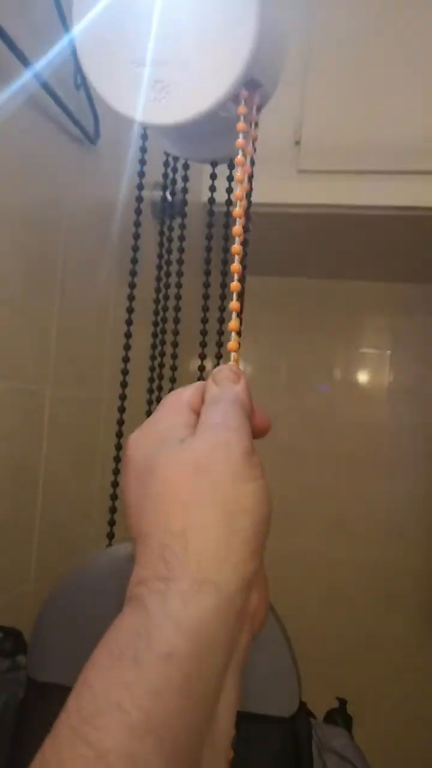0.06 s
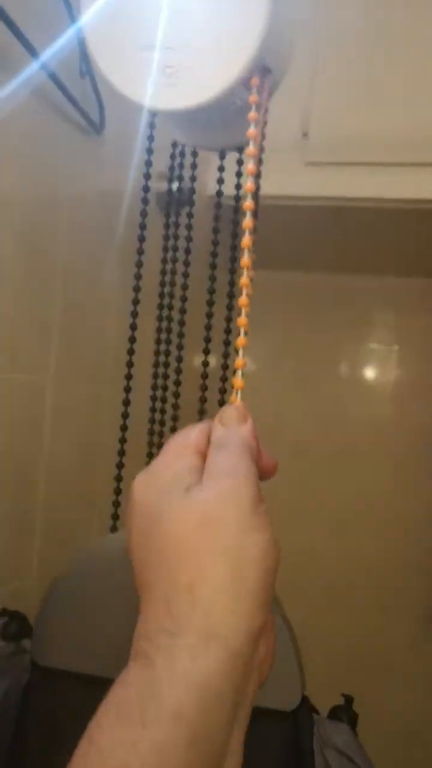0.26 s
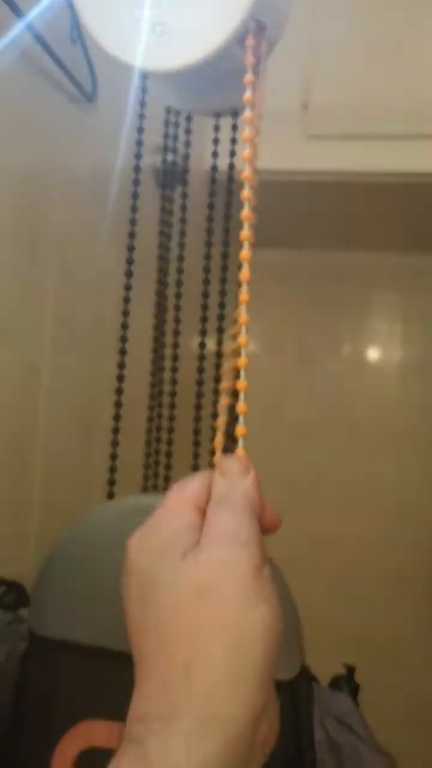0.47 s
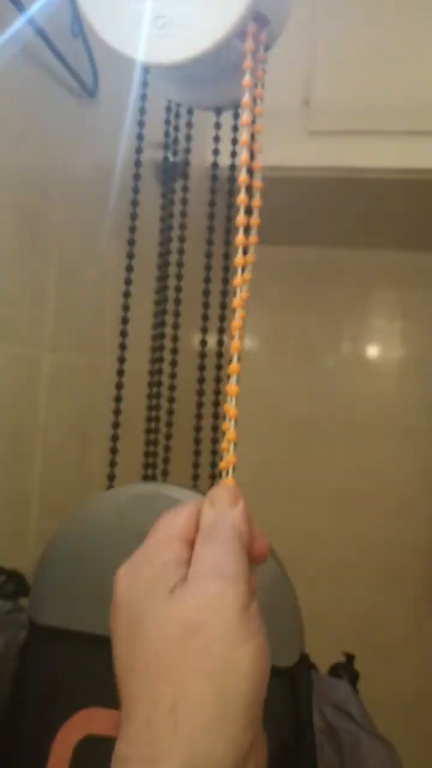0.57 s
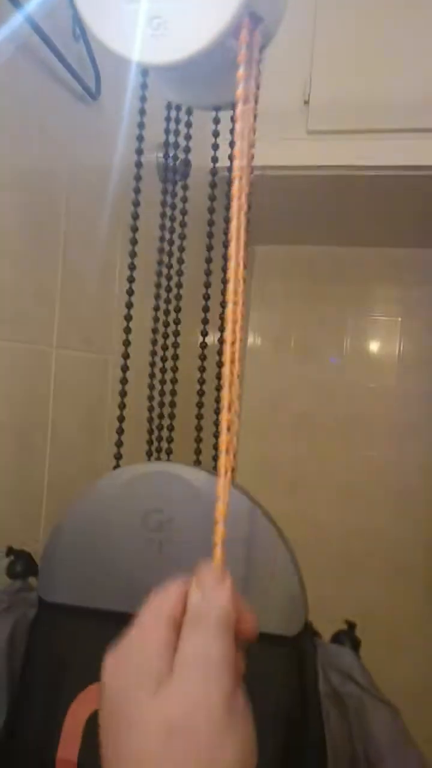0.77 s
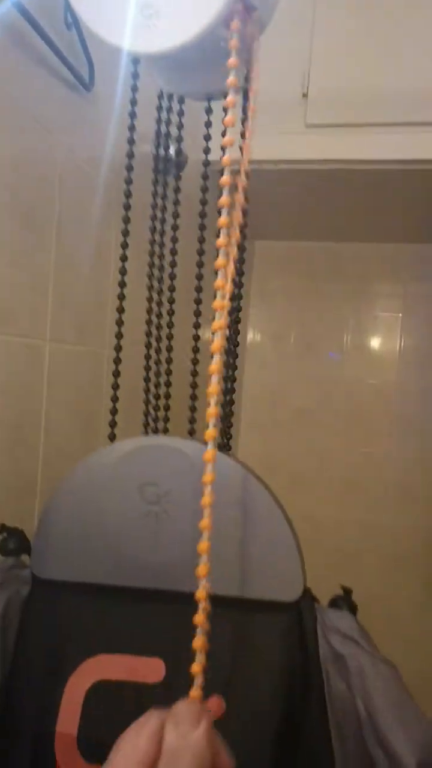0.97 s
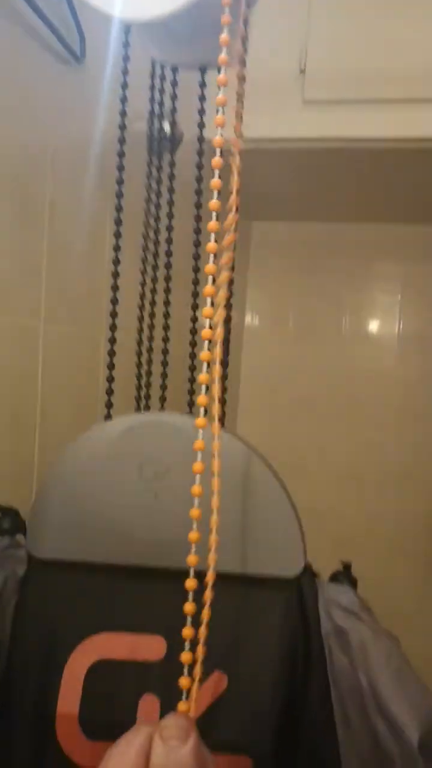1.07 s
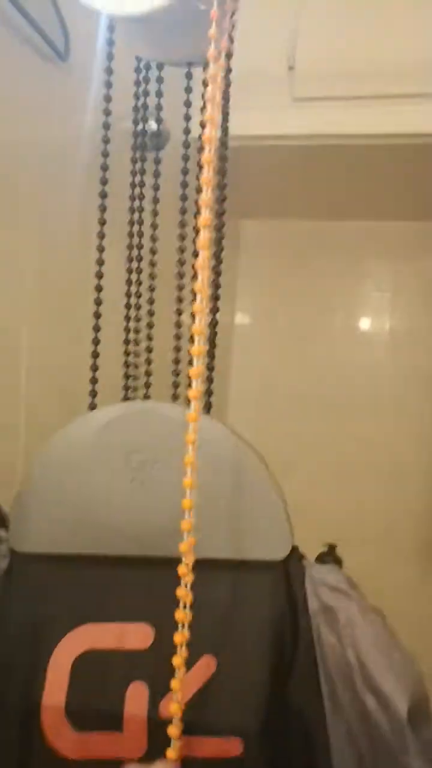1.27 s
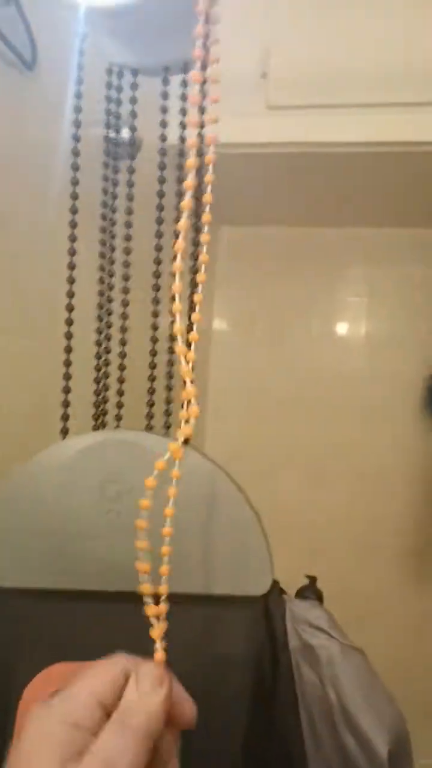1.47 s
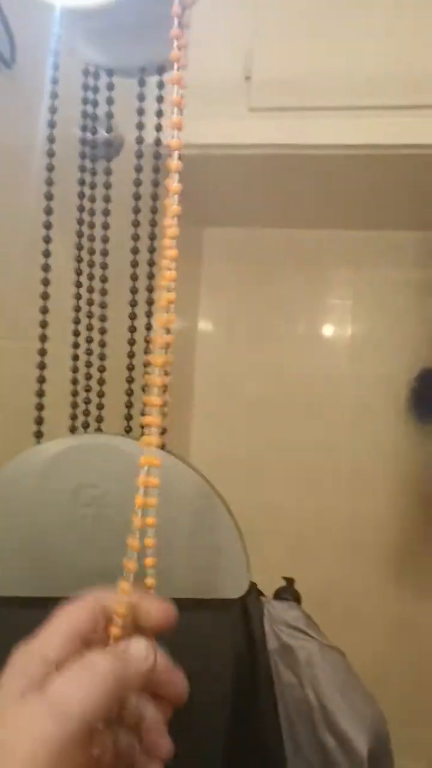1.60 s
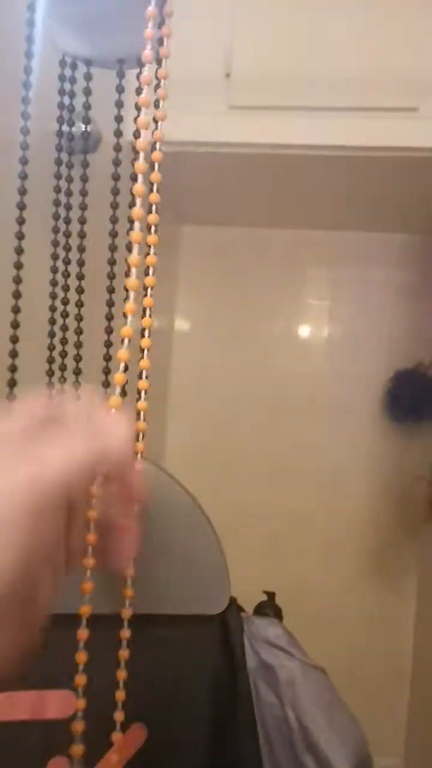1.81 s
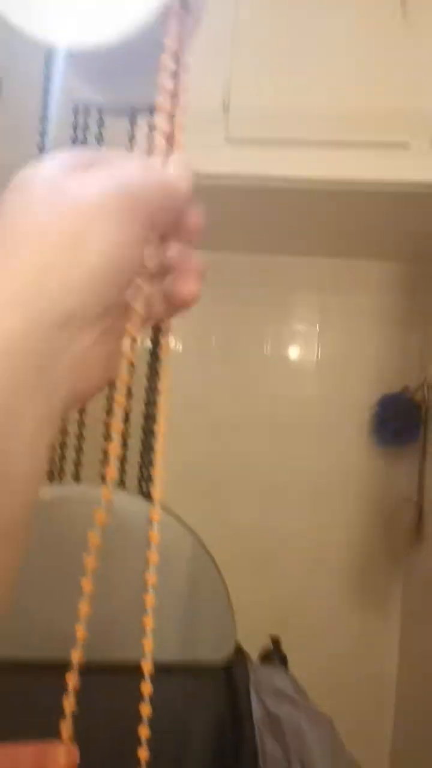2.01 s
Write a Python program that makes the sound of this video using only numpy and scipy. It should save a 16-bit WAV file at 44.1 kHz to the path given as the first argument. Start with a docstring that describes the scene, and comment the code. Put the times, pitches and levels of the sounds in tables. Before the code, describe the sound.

A bead chain rattles and clicks through a geared wheel, then stops with light ticks.

```python
"""A plastic bead chain is pulled through the geared wheel of a ceiling rack in a small tiled room.
Beads snap into the wheel over a dense rattle of gears, heard a little from the right. The wheel creaks
as it takes the load, then rumbles and shudders; the housing knocks loudest at the hardest pull.
The pull stops at 1.5 s. Close to the right microphone the slack strands tick against each other,
and the hand catches the chain with a soft bump."""
import sys
import numpy as np
from scipy import signal
from scipy.fft import rfft, irfft
from scipy.io import wavfile
from scipy.ndimage import uniform_filter1d

SR = 44100
rng = np.random.default_rng(int(sys.argv[2]) if len(sys.argv) > 2 else 0)


def pcm_store(signal):
    """Save signal as 16-bit PCM."""
    levels = np.round(np.clip(np.atleast_2d(signal), -1, 1) * 32767)
    wavfile.write(sys.argv[1], SR, levels.astype(np.int16).T)


N = 90404
PLACES = 4  # spots on the drive, each exciting the room differently
TICK_RISE_S = 0.0001477


def amp(db):
    """Decibels to gain."""
    return 10 ** (np.asarray(db) / 20)


def unit(x):
    """Scales to an rms of one."""
    return x / np.sqrt(np.mean(x ** 2) + 1e-20)


def read(points, hz):
    """Reads (Hz, value) points on a log-frequency axis."""
    f, value = np.transpose(points)
    return np.interp(np.log(hz + 1), np.log(f + 1), value)


def level(points):
    """Turns (seconds, dB) points into a gain per sample."""
    return amp(np.interp(np.arange(N) / SR, *np.transpose(points)))


def add(mix, s, sound):
    """Adds a sound to the mix, starting at s seconds."""
    part = mix[max(round(s * SR), 0):][:len(sound)]
    part += sound[:len(part)]


def causal(db, size=2048):
    """Shortest impulse response of unit energy with the spectral shape db(hz)."""
    log_gain = db(abs(np.fft.fftfreq(size, 1 / SR))) * np.log(10) / 20
    taps = np.fft.ifft(np.exp(np.conj(signal.hilbert(log_gain)))).real
    return taps[:size // 2] / np.linalg.norm(taps)


def focus(hz, pitch_hz, octaves=0.48):
    """A bell curve around a pitch, 1 at its top."""
    return np.exp(-(np.log2((hz + 1) / pitch_hz) / octaves) ** 2)


def contact(rise_s, swell=1, size=1024, passes=4):
    """A brief chatter of two hard surfaces, loudest after rise_s: unit energy, nearly flat spectrum."""
    u = np.arange(size) / SR / rise_s
    shape = (u * np.exp(1 - u)) ** swell
    x = rng.standard_normal(size)
    for _ in range(passes):  # shape in time, then flatten the spectrum
        x = irfft(np.exp(1j * np.angle(rfft(x * shape))))
    x = x * np.sqrt(shape)
    return x / np.linalg.norm(x)


def ringing(modes, size=11025):
    """Sum of dying modes (Hz, dB, T60 in seconds), of unit energy."""
    t = np.arange(size) / SR
    ring = sum(amp(db - 60 * t / t60) * np.sin(2 * np.pi * hz * t) for hz, db, t60 in modes)
    return ring / np.linalg.norm(ring)


def bump(hz, rise_s):
    """A few low cycles that swell and die."""
    t = np.arange(SR // 4) / SR
    u = t / rise_s
    return u * np.exp(-u ** 2 / 2) * np.sin(2 * np.pi * hz * t)


def noise(spectrum):
    """Stereo noise with a given spectrum, alike at both microphones in the bass."""
    # Likeness of left and right. Each row: frequency in Hz, correlation from 0 to 1.
    likeness = [(30, 1), (120, .97), (250, .82), (450, .1), (15000, 0)]
    hz = np.fft.rfftfreq(N, 1 / SR)
    same = read(likeness, hz)
    left, other = rfft(rng.standard_normal((2, N)))
    right = same * left + np.sqrt(1 - same ** 2) * other
    return unit(irfft(np.array([left, right]) * amp(read(spectrum, hz)), N))


def room(x, wet_db, left_db=0, smear_s=0.000041):
    """Direct sound, smeared at the left microphone, then reflections and the short tail of tiled walls."""
    # Decay of the room. Each row: frequency in Hz, T60 in seconds.
    decay_times = [(300, 0.02), (1200, 0.27), (3000, 0.15), (8000, 0.17), (14000, 0.09)]
    # First reflections. Each row: delay in seconds, relative gain.
    echoes = [(.0016, 0.21), (.0042, 0.23), (.0078, 0.091), (.0098, 0.1)]
    size, onset_s, right_lead_s = SR // 2, 0.0023, .0001
    hz, t, spectra = signal.stft(rng.standard_normal((2, size)), SR, nperseg=256)
    decay = amp(-60 * t / read(decay_times, hz)[:, None])
    response = signal.istft(spectra * decay, SR, nperseg=256)[1][:, :size]
    response *= 1 - np.exp(-np.arange(size) / SR / onset_s)
    for side in response:
        side /= np.linalg.norm(side)
        for delay, gain in echoes:
            add(side, delay * rng.uniform(.85, 1.15), gain * contact(TICK_RISE_S))
    response *= amp(wet_db)
    add(response[0], right_lead_s, amp(left_db) * contact(smear_s))
    add(response[1], 0, np.ones(1))
    return signal.fftconvolve(np.atleast_2d(x), response, axes=1)[:, :N]


def room_tone():
    """The faint, steady background of the quiet room."""
    # Colour of the background. Each row: frequency in Hz, relative level in dB.
    spectrum = [(20, 9.5), (60, 4.5), (120, -3), (300, -8.5), (480, -19.5), (1000, -17.5), (2000, -14.5),
                (2650, -15.5), (4200, -31), (7500, -27), (10000, -29), (15500, -31)]
    return amp(-61.5) * noise(spectrum)


def gears():
    """Dense small impacts of teeth and sliding beads, passing from place to place as the chain sways."""
    # Strength of the rattle, following the pull. Each row: time in seconds, level in dB.
    pull = [(0, -40.5), (.06, -48.5), (.11, -47), (.145, -59.5), (.17, -44), (.26, -41.5), (.33, -40),
            (.4, -37.5), (.46, -37.5), (.52, -36.5), (.6, -40.5), (.72, -40.5), (.8, -34.5), (.87, -28.5),
            (.96, -31.5), (1.02, -37.5), (1.09, -41), (1.15, -39), (1.22, -33), (1.27, -36), (1.3, -43),
            (1.335, -49.5), (1.36, -36.5), (1.41, -35.5), (1.47, -41), (1.5, -83), (1.53, -72),
            (1.7, -70.5), (1.78, -62.5), (1.83, -59), (1.87, -76.5), (2.05, -72.5)]
    # Colour of the rattle. Each row: frequency in Hz, relative level in dB.
    spectrum = [(200, -22), (450, -24.5), (750, -11.5), (1400, -13), (1900, -5), (2700, -3.5), (4200, -6),
                (6400, -6), (7300, -2), (7950, -6), (8700, -13), (9800, -20), (13000, -24.5), (15500, -43)]
    hits_per_s, spread_db, sway_hz = 1000, 3, 2.3
    body = causal(lambda hz: read(spectrum, hz))
    out, t = np.zeros((2, N)), np.arange(N) / SR
    for place in range(PLACES):
        share = np.maximum(np.cos(2 * np.pi * (sway_hz * t + place / PLACES)), 0)
        hits = (rng.random(N) < hits_per_s / SR) * rng.choice([-1, 1], N)
        hits = hits * amp(spread_db * np.minimum(rng.exponential(1, N), 3))
        clicks = unit(signal.fftconvolve(hits, contact(TICK_RISE_S))[:N])
        rattle = signal.fftconvolve(clicks, body)[:N]
        out += room(rattle * share * level(pull), wet_db=1, smear_s=0.0018)
    return amp(-4.5) * out


def wheel():
    """The turning wheel rumbles, with a slow, uneven shudder under the pull."""
    # Course of the rumble and of the shudder. Each row: time in seconds, level in dB.
    rumble_levels = [(0, -54), (.12, -67.5), (.26, -57.5), (.33, -50.5), (.6, -51.5), (.8, -53), (.87, -43),
                     (1.0, -48.5), (1.08, -54.5), (1.17, -44.5), (1.3, -54), (1.45, -46), (1.56, -68.5),
                     (1.78, -76), (1.84, -60), (1.92, -84)]
    shudder_levels = [(0.0, -54.5), (0.08, -46), (0.26, -37.5), (0.29, -56), (0.34, -36), (0.56, -36.5),
                      (0.61, -46.5), (0.73, -35), (0.92, -37.5), (0.99, -52), (1.07, -35.5), (1.23, -32),
                      (1.33, -45), (1.41, -35), (1.5, -36.5), (1.6, -66), (1.96, -63), (2.05, -82.5)]
    # Colour of the rumble. Each row: frequency in Hz, relative level in dB.
    spectrum = [(35, -19), (55, 0), (70, 6), (95, -5.5), (150, -2), (165, -11), (181, 4.5), (200, -7),
                (270, -2.5), (350, -11.5), (450, -18), (900, -43), (3000, -70.5)]
    shudder_hz, wander_depth = 27, 0.1474
    wander = unit(uniform_filter1d(rng.standard_normal(N), size=2000))
    cycles = np.cumsum(shudder_hz * (1 + wander_depth * wander)) / SR
    shudder = amp(-3) * unit(np.sin(2 * np.pi * cycles))
    return noise(spectrum) * level(rumble_levels) + shudder * level(shudder_levels)


def beads():
    """Each bead chatters into its pocket in the wheel, with a bright zing and a short hollow ring."""
    # Bead snaps. Each row: start in seconds, level in dB, top and mid tint in dB, ring pitch in Hz.
    strikes = [(0.0748, -28, -40, 1, 2890), (0.151, -29, -14, -8, 2750), (0.2027, -23, -22, -16, 2800),
               (0.2729, -26, -42, -15, 3460), (0.2918, -18.5, -35, -15, 3200), (0.347, -23, -11, -41, 3680),
               (0.3547, -40, -11, -24, 2950), (0.367, -16, -31, -16, 2950), (0.385, -21.5, -30, -20, 2970),
               (0.4307, -15.5, -51, -22, 3580), (0.4764, -17.5, -25, -20, 3440),
               (0.4888, -17, -56, -21.5, 4050), (0.5348, -22, -18, -13, 3330),
               (0.5465, -15, -29, -19.5, 3470), (0.6001, -25.5, -18.5, 0.5, 3440),
               (0.6149, -13.5, -28.5, -24, 3870), (0.6685, -23.5, -22, -6, 3270),
               (0.683, -14, -30.5, -24, 3040), (0.7355, -19, -23.5, -16.5, 3240),
               (0.7499, -14, -33, -21.5, 3420), (0.7867, -23, -21, -12.5, 3400),
               (0.7931, -13.5, -33, -27, 3300), (0.8248, -18.5, -23, -14, 3470),
               (0.8296, -9.5, -24.5, -25, 3340), (0.8563, -17.5, -26, -23.5, 2680),
               (0.8603, -9.5, -22, -28, 3360), (0.8884, -8, -19, -13.5, 2730),
               (0.9173, -10.5, -22.5, -24, 4020), (0.9471, -11.5, -13, -15, 3260),
               (0.9805, -17, -15, -20.5, 3380), (0.9856, -15, -27, -13, 2790),
               (1.0411, -16.5, -36, -19, 3100), (1.1155, -18, -54.5, -9.5, 3220),
               (1.1703, -19.5, -28, -11, 3200), (1.1818, -14.5, -38, -18, 2910),
               (1.1974, -22, -29, -10, 3360), (1.2116, -15.5, -19.5, -15, 3750),
               (1.221, -15, -27, -15.5, 2940), (1.251, -19, -23, -12, 3410), (1.2638, -14, -28, -24, 2730),
               (1.3427, -23.5, -51, -35, 3280), (1.349, -23, -52, 15, 3380), (1.3708, -29, -34, -12, 2830),
               (1.3864, -19, -34, -9, 3300), (1.3967, -20, -23, -17, 2700), (1.4214, -19.5, -23, -12, 3330),
               (1.4571, -23.5, -20, -17, 2780)]
    # Colour common to all snaps. Each row: frequency in Hz, relative level in dB.
    spectrum = [(200, -25), (700, -29), (1600, -15.5), (2300, -14), (3100, -4.5), (4000, -5.5),
                (6200, -5.5), (7200, -4.5), (7900, -0.5), (8700, -6), (9800, -17.5), (13000, -21),
                (15500, -45)]
    usual_top_db, usual_mid_db, tint_share = -22, -11.5, 0.63
    rise_s, ring_t60_s, zing_t60_s = .0016, .016, .012
    likeness = 0.38  # share of the chatter common to both microphones
    snaps, rings = np.zeros((PLACES, 2, N)), np.zeros((2, N))
    for k, (s, db, top_db, mid_db, ring_hz) in enumerate(strikes):
        tint = [(4000, mid_db - usual_mid_db), (6500, 0), (8500, 0.014), (11000, top_db - usual_top_db)]
        body = causal(lambda hz: read(spectrum, hz) + tint_share * read(tint, hz))
        zing_hz = 7750 * (1 + .05 * rng.uniform(-0.92, 1))
        zing = amp(-12) * ringing([(zing_hz, 0, zing_t60_s)], size=2048)
        hollow = amp(-9) * ringing([(ring_hz, 0, ring_t60_s)], size=2048)
        shared = contact(rise_s, swell=1.8, passes=1)
        for side in range(2):
            own = contact(rise_s, swell=1.8, passes=1)
            chatter = np.sqrt(likeness) * shared + np.sqrt(1 - likeness) * own
            snap = amp(db + 10.5) * signal.fftconvolve(chatter, body)
            add(snaps[k % PLACES, side], s, snap)
            add(rings[side], s, signal.fftconvolve(snap, hollow + zing))
    return sum(room(place, wet_db=-1.5) for place in snaps) + room(rings, wet_db=-7)


def creak():
    """A short pitched creak that swells and dies as the wheel takes the load."""
    # Partials of the creak. Each row: frequency in Hz, relative level in dB.
    modes = [(1600, -3), (1680, -4), (1940, -1), (2020, -2.5)]
    start_s, rise_s = .104, 0.0089
    out, t = np.zeros(N), np.arange(SR // 8) / SR
    u = t / rise_s
    tone = sum(amp(db) * np.sin(2 * np.pi * (hz * t + rng.random())) for hz, db in modes)
    add(out, start_s, amp(-45.5) * u * np.exp(1 - u) * tone)
    return room(out, wet_db=-13)


def thuds():
    """Dull jolts during the pull, and a softer bump as the hand catches the chain again."""
    # Jolts, equal at both microphones. Each row: start in seconds, level in dB, pitch in Hz.
    jolts = [(0.323, -37, 140), (0.455, -37, 95), (0.583, -38, 115), (0.821, -35, 110), (0.881, -34, 90),
             (1.083, -39, 80), (1.157, -35, 170), (1.205, -35, 230), (1.366, -35, 85), (1.441, -35, 190)]
    rise_cycles, catch_s = 0.68, 1.815
    out = np.zeros(N)
    for s, db, hz in jolts:
        add(out, s, amp(db - 1.5) * bump(hz, rise_cycles / hz))
    add(out, catch_s, amp(-47.5) * bump(hz=70.5, rise_s=.032))
    return out


def housing():
    """Hollow knocks, each with its own pitch, that ring the plastic shell."""
    # Knocks on the housing. Each row: start in seconds, level in dB, pitch in Hz.
    strikes = [(0.403, -33, 1380), (0.832, -30, 850), (0.8903, -14.5, 2230), (0.8925, -23, 850),
               (0.898, -17, 1170), (0.9485, -16.5, 2460), (0.956, -28, 2790), (0.969, -25, 2200),
               (1.135, -33, 1120), (1.162, -32, 850), (1.274, -24, 1170), (1.286, -30, 1300),
               (1.425, -34, 2800), (1.44, -34, 700)]
    # Colour common to all knocks. Each row: frequency in Hz, relative level in dB.
    spectrum = [(200, -32.5), (480, -9), (720, 1), (900, -7.5), (1150, 5.5), (1600, 5), (2400, 5.5),
                (3300, -4), (5000, -8), (12000, -67)]
    # Modes of the shell. Each row: frequency in Hz, relative level in dB, T60 in seconds.
    modes = [(715, -8, .17), (1168, 0, .17), (1454, -5, .15), (1855, 0, .2), (2318, -1, .16),
             (2675, -1, .1), (3262, -2, .1)]
    focus_db, left_db = 6.5, 1
    blows, knocks = np.zeros((2, N))
    for s, db, pitch_hz in strikes:
        blow = amp(db + 12.5) * contact(rise_s=0.00089)
        body = causal(lambda hz: read(spectrum, hz) + focus_db * focus(hz, pitch_hz))
        add(blows, s, blow)
        add(knocks, s, signal.fftconvolve(blow, body))
    shell = amp(-7) * signal.fftconvolve(blows, ringing(modes))[:N]
    return room(knocks + shell, wet_db=-1.5) * amp([[left_db], [0]])


def slack_chain():
    """Loose beads tick by the right microphone, ring briefly and send a duller shiver along the chain."""
    # Strands touching. Each row: start in seconds, level in dB, then pitch, low and high edge in Hz.
    ticks = [(1.6316, -43.5, 8870, 1960, 15100), (1.728, -24.5, 3830, 3060, 7400),
             (1.787, -42.5, 7400, 2000, 12000), (1.801, -36, 7570, 3500, 14900),
             (1.8097, -29.5, 5400, 1430, 8600), (1.825, -30.5, 2850, 930, 13000),
             (1.834, -33, 8140, 890, 12940), (1.839, -36.5, 2330, 910, 9900),
             (1.883, -50, 6000, 3010, 7000), (1.952, -47, 3220, 2500, 3800)]
    # Colour common to all ticks. Each row: frequency in Hz, relative level in dB.
    spectrum = [(200, -27), (900, 1), (2000, 2.5), (3300, 0.5), (7200, 2.5), (9500, -6.5), (15500, -11.5)]
    cut_db, focus_db, ring_t60_s = -48, 6.5, .007
    chain_body = causal(lambda hz: 22 * focus(hz, pitch_hz=2040))
    out = np.zeros(N)
    for s, db, pitch_hz, low_hz, high_hz in ticks:
        band = [(low_hz / 2, cut_db), (low_hz, 0), (high_hz, 0), (high_hz * 2, cut_db)]
        body = causal(lambda hz: read(spectrum, hz) + read(band, hz) + focus_db * focus(hz, pitch_hz))
        tick = signal.fftconvolve(amp(db + 11) * contact(TICK_RISE_S), body)
        ring = amp(-16) * signal.fftconvolve(tick, ringing([(pitch_hz, 0, ring_t60_s)]))
        shiver = signal.fftconvolve(amp(db - 4) * contact(rise_s=.006, size=2048), chain_body)
        for sound in (tick, ring, shiver):
            add(out, s, sound)
    return room(out, wet_db=-13, left_db=-20)


def scene():
    """The chain drive, heard a little from the right, over the quiet room."""
    # Lean of the drive between the microphones. Each row: frequency in Hz, left minus right in dB.
    balance = [(100, 15), (300, -9), (700, 7.5), (1200, -0.5), (2000, -0.5), (3200, -5.5), (5000, -5.5),
               (6500, -2.5), (7500, 0), (8700, -8.5), (9500, -8), (10500, -10), (14000, -12.5)]
    lean_db = read(balance, np.fft.rfftfreq(N, 1 / SR)) / 2
    drive = beads() + gears() + housing() + creak()
    drive = irfft(rfft(drive, N) * amp([lean_db, -lean_db]), N)
    return drive + slack_chain() + wheel() + thuds() + room_tone()


def record(dry):
    """Both channels roll off steeply at 15.5 kHz."""
    lowpass = signal.firwin(255, 15500, window=("kaiser", 9), fs=SR)
    return signal.oaconvolve(dry, lowpass[None], "same")


dry = scene()
out = record(dry)
pcm_store(out)
```